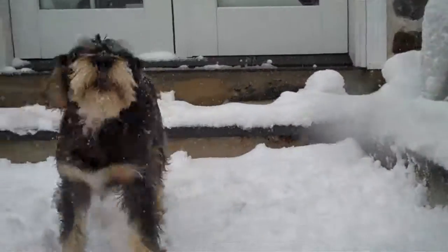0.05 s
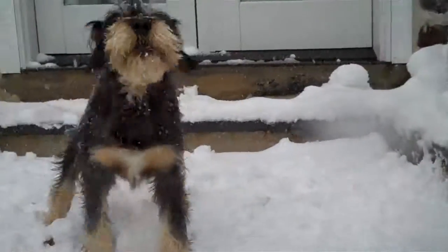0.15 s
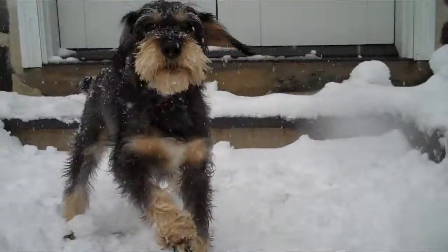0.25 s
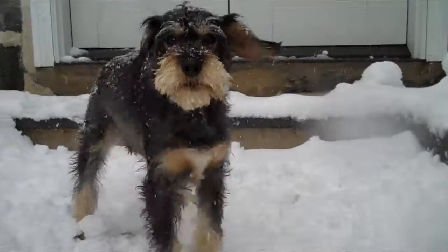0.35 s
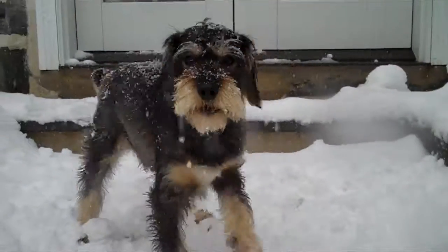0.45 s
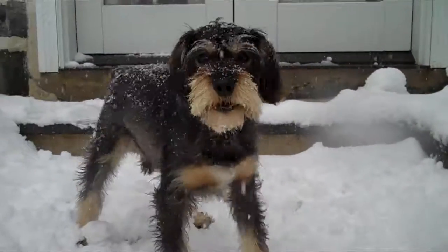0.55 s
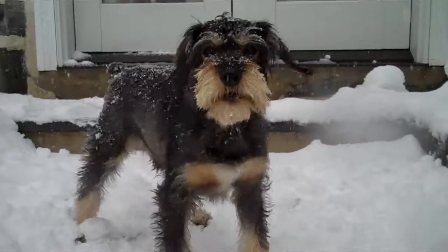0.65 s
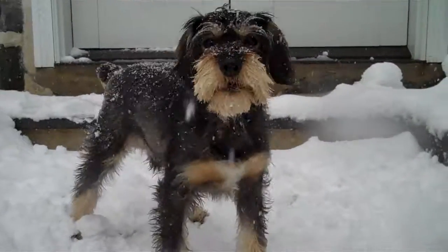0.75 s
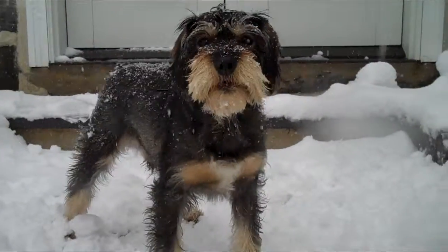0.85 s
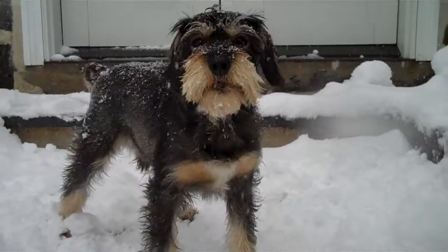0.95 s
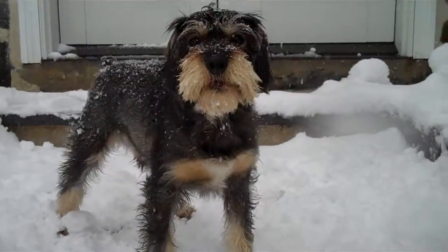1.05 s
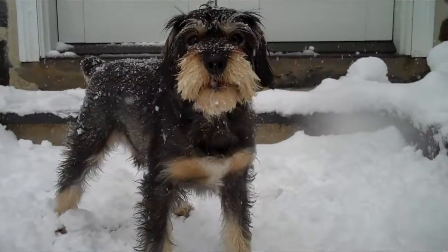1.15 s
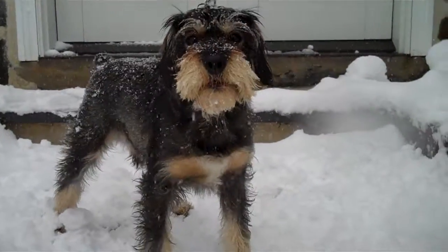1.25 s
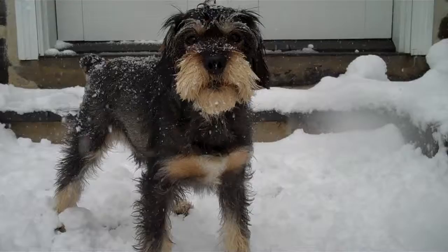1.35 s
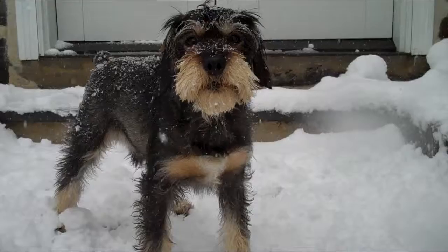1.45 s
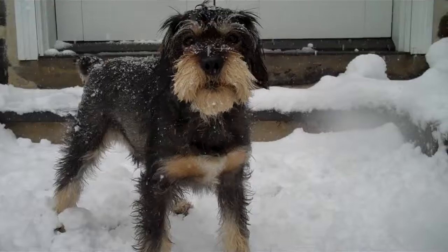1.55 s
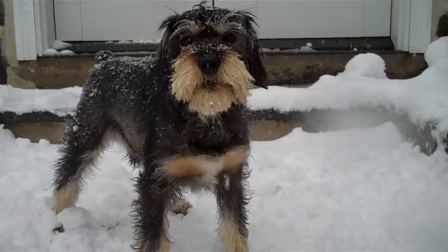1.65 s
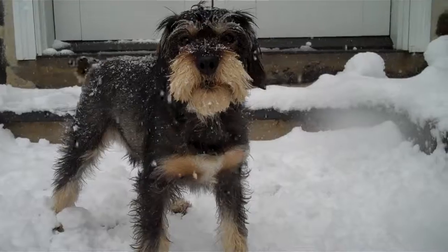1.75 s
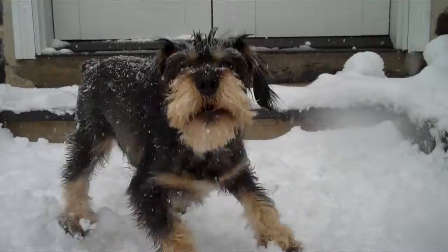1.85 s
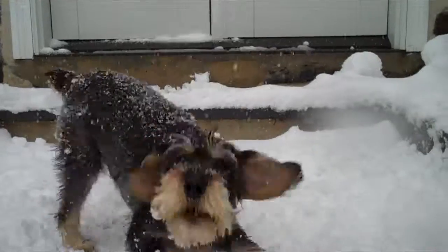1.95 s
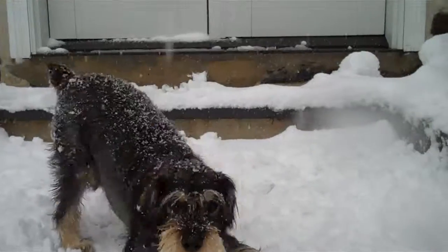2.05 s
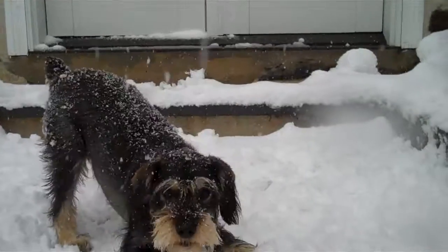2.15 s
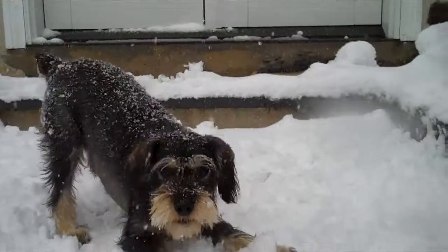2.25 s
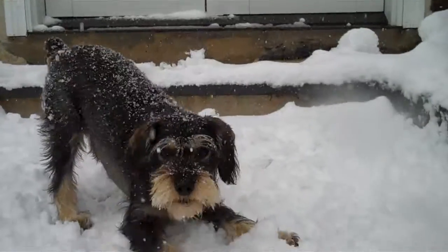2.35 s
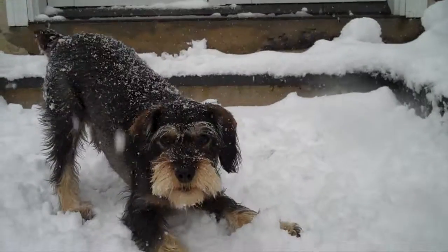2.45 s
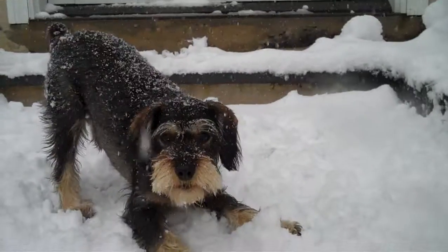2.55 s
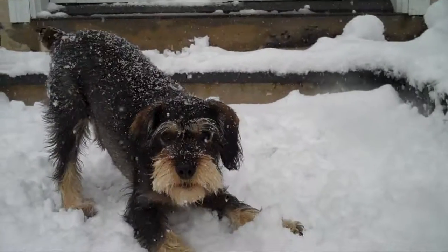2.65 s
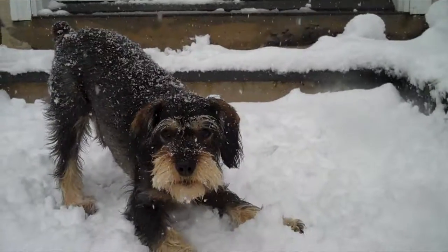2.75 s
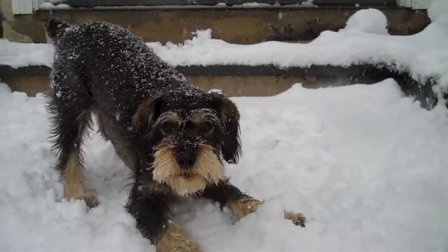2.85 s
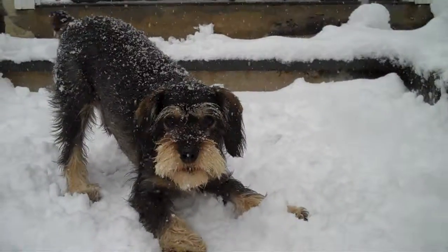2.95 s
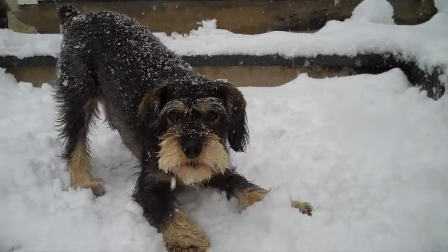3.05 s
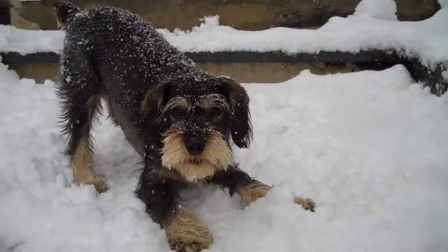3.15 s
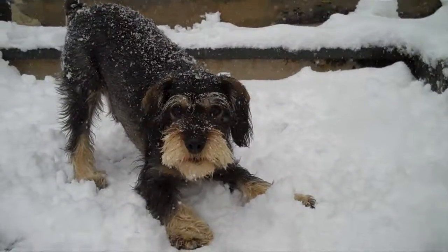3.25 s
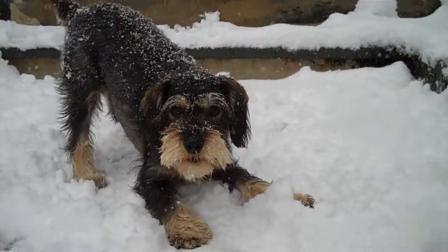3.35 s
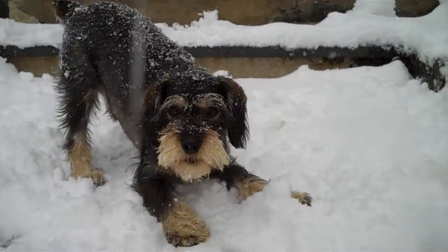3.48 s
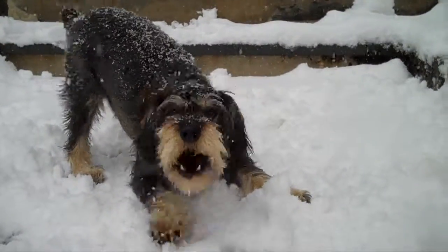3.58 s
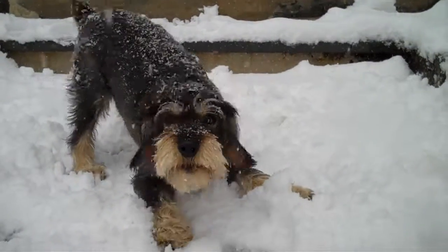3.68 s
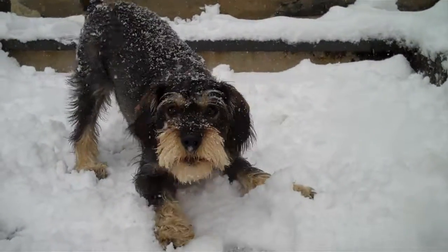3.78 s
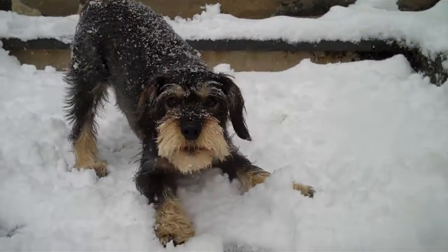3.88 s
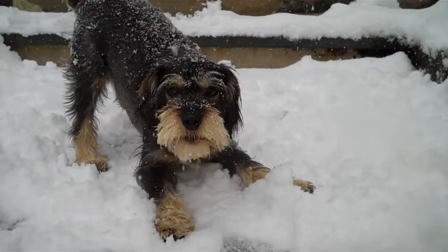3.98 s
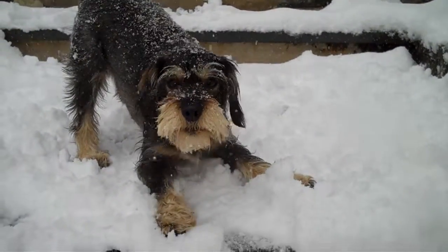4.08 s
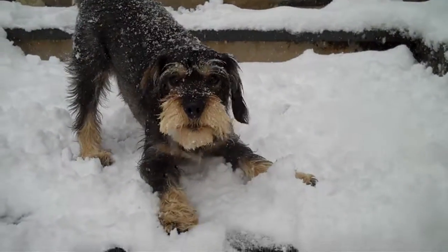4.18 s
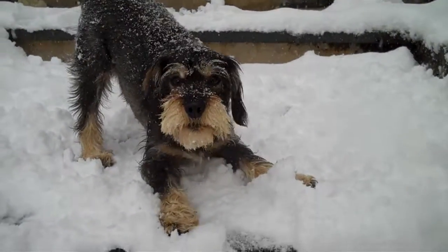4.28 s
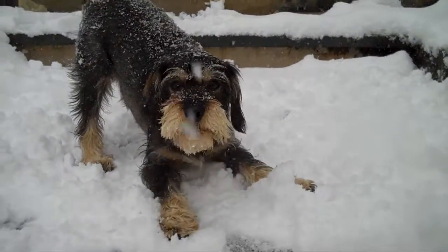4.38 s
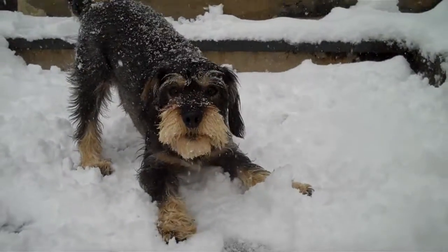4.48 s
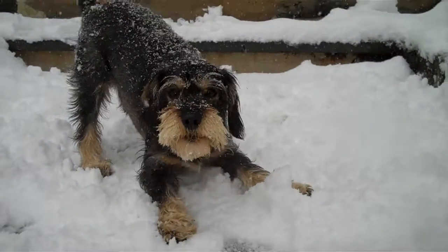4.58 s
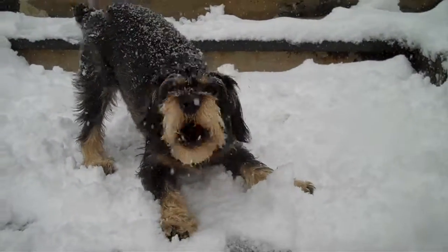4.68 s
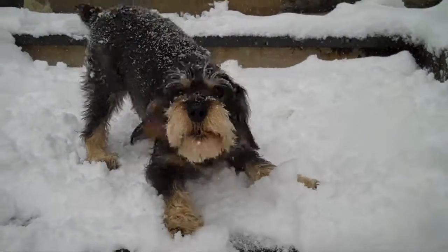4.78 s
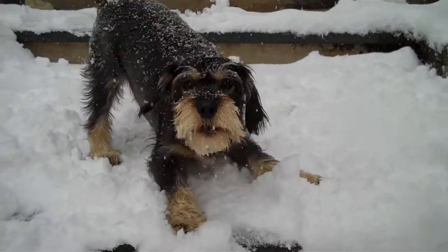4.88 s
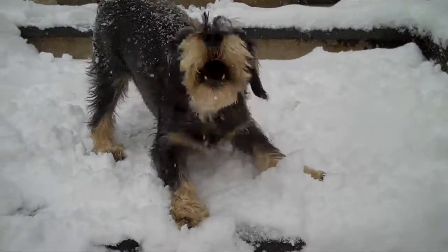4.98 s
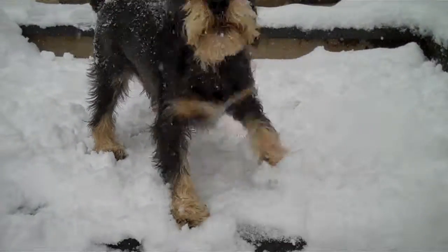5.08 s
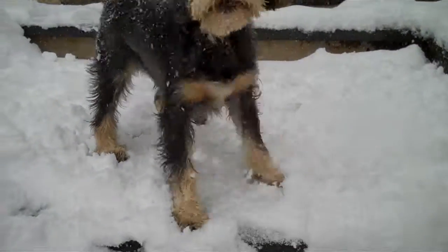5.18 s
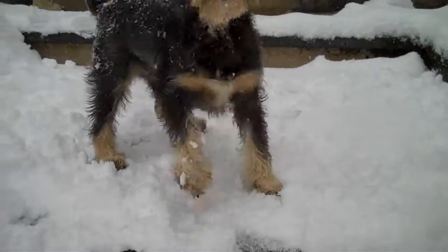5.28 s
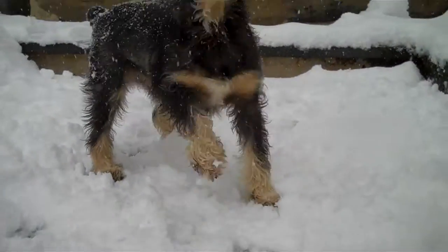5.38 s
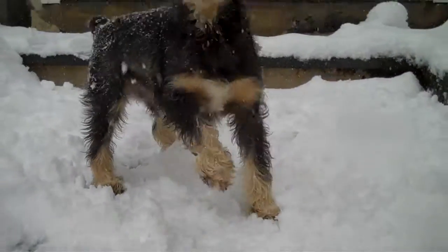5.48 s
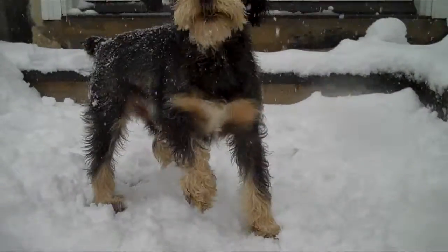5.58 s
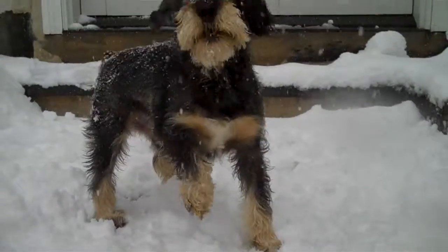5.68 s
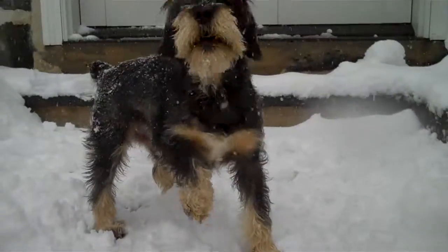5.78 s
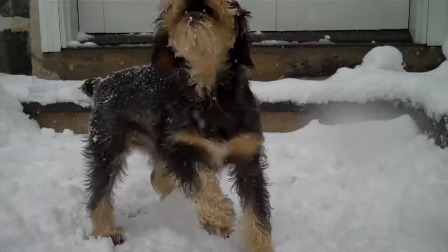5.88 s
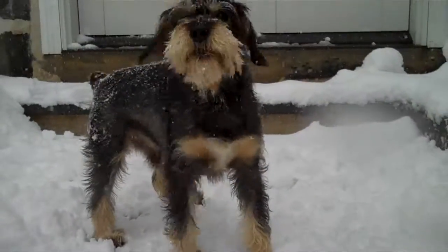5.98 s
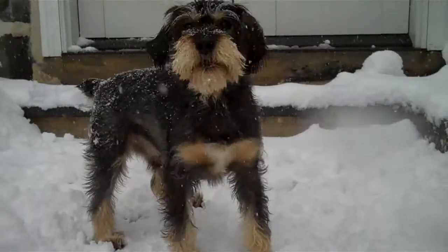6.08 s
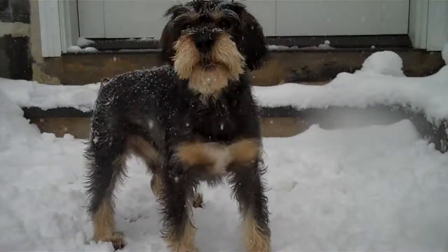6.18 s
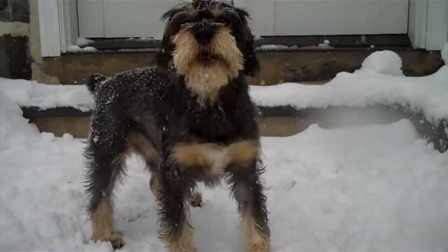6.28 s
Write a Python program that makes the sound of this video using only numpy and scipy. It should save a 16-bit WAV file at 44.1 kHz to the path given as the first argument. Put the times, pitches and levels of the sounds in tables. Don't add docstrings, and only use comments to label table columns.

```python
import sys
import numpy as np
from scipy import signal
from scipy.fft import rfft, irfft, next_fast_len
from scipy.io import wavfile
from scipy.ndimage import uniform_filter1d

SR = 44100
rng = np.random.default_rng(int(sys.argv[2]) if len(sys.argv) > 2 else 0)


def dump(signal):
    limited = np.clip(np.atleast_2d(signal).T, -1, 1)
    pcm = np.round(limited * 32767).astype(np.int16)
    wavfile.write(sys.argv[1], SR, pcm)


def rack_gain(trim_db):
    fader = np.asarray(trim_db, float)
    return 10 ** (fader / 20)


N = 279153

# loudest_s, attack_s, hold_s, effort_db
BARKS = [
    (0.141, .065, 0.042, -12.5),
    (1.932, .035, 0.0835, -3),
    (3.641, .025, 0.0787, -5.5),
    (4.747, .027, 0.08313, -5),
    (5.034, .04, 0.06583, -8.5),
    (5.432, .042, 0.08254, -10),
    (5.899, .035, 0.0746, -6),
]
# top_hz, climb_s, sag_start_s
BARK_PITCH = [(636.4, 0.077, .172), (694.2, .068, 2.013), (679.6, .062, 3.7), (695.7, 0.06, 4.815),
              (676.8, 0.058, 5.078), (683.2, 0.049, 5.482), (687.1, 0.064, 5.957)]
# start_s, end_s, second_tone_above_hz, first_depth (0-1), last_depth (0-1)
VOICE_BREAKS = [(.19, .25, 150, .1, .1), (1.93, 2.06, 250, .2, .15), (3.678, 3.74, 100, 1, .1),
                (4.728, 4.88, 130, .8, .2), (5.036, 5.112, 105, .7, 0), (5.435, 5.525, 160, .35, .5),
                (5.915, 6.02, 170, .7, .4)]
# frequency_hz, level_db
THROAT = [(150, -46), (350, -13.5), (520, 2), (780, -4), (1000, -4), (1550, -6.5), (2100, -11.5),
          (2800, -18), (3400, -26.5), (5000, -38.5), (6200, -24.5), (7500, -18), (9000, -33.5),
          (14000, -47)]
# frequency_hz, width_hz, lift_db
MOUTH = [(738.8, 160, 1.5), (1612.2, 180, 4.5), (2167.2, 200, 4), (2643.6, 68, 1), (3330, 660, 2),
         (4450, 540, 6.5), (6825, 150, 0.5), (7593, 130, 1.5)]
# start_s, length_s, first_level_db, last_level_db, mouth_resonance_hz
GROWLS = [
    (3.883, .16, -50, -50, 598),
    (5.141, .09, -38, -50, 522),
    (5.205, .2, -53.5, -32.5, 550.6),
    (5.566, .075, -41, -61, 625.3),
]
GROWL_CHEST_DB = [6.5, -20.5, -25.5, -6.5]
GROWL_NASAL_DB = [1.5, -11.5, -10.5, 2]
# frequency_hz, width_hz, level_db
SHUT_MOUTH = [(313, 100, -13), (1103.7, 400, -11), (2210, 172, -15), (3300, 350, -13.5), (3816, 330, -18),
              (6490, 850, -8), (7290, 450, -8.5), (8247, 210, -16.5)]
# loudest_s, level_db,
# fall_db_per_s
SHUFFLES = [(0.025, -61, 907), (0.138, -34, 72.5), (0.229, -28, 345), (0.286, -46, 77.5), (2.05, -43, 200),
            (6.03, -47, 180)]
# frequency_hz, density_db_per_hz
SNOW_SPECTRUM = [(88, -17.5), (150, -10), (292, -6), (488, 2), (757, -10.5), (988, -2.5), (1720, -11),
                 (2160, -3.5), (4800, -14.5), (7730, -3.5), (14200, -40.5)]
# start_s, peak_db, ring_hz, left_right_db
FLAKES = [(0.0243, -35, 4390, 7), (0.0634, -51.5, 7520, 45.5), (0.617, -42, 1340, -7),
          (0.8608, -36, 7260, 8), (1.1273, -47, 8170, -14.5), (1.2167, -37.5, 1224, 4),
          (1.714, -46.5, 7250, 5.5), (1.7372, -50.5, 6900, -2.5), (1.8412, -34, 7600, 13.5),
          (2.2565, -41.5, 2208, -9.5), (2.4887, -58, 7900, 20), (2.7873, -48, 1480, -4),
          (2.8724, -49.5, 1487, 0), (3.2056, -51, 1221, 0.5), (3.2466, -42, 2160, -10),
          (3.8042, -48.5, 1325, 6.5), (4.0715, -58, 1282, -5.5), (4.1647, -59, 1300, -1),
          (4.6983, -43, 1690, -2)]
# loudest_s, level_db
FAR_CALLS = [(.7, -42), (0.949, -50), (1.29, -41.5), (2.565, -52.5), (2.811, -62), (2.985, -45),
             (3.295, -61.5), (4.315, -52), (4.61, -63)]
# pitch_hz, rasp (0-1), second_overtone_db, third_overtone_db
FAR_VOICES = [(575, 0.611, -1, 6), (726.1, 0.185, 1.5, -12), (570.7, 0.401, 8.5, -2.5),
              (685, 0.656, 7.5, -23), (728.2, 0.2, -4, -9.5), (570.1, 0.207, 14, -7.5),
              (634.6, 0.436, 12, -1), (673.5, 0.73, 8, -27.5), (706, 0.17, -3.5, -9)]
# frequency_hz, density_db_per_hz
AIR_SPECTRUM = [(15, -42), (25, -17), (65, -7.5), (117, -10), (170, -3), (258, -9), (500, -11), (1000, -17),
                (1300, -22), (2050, -24.5), (4500, -30), (7700, -20), (9500, -27.5), (13900, -24)]
# frequency_hz, likeness
AIR_LIKENESS = [(60, 0.8), (230, 0.63), (910, 0.978), (3540, 0.74), (13800, -1.2)]
# frequency_hz, likeness
DOG_LIKENESS = [(60, 0.32), (230, 1), (910, 0.92), (3540, 0.51), (13800, 0.7287)]
# frequency_hz, left_right_db
DOG_PAN = [(60, -1.5), (180, 1), (530, -1.5), (1560, 3), (4640, 4), (13800, 9)]
# frequency_hz, t60_s
WALL_DECAY = [(300, 0.088), (700, .17), (2000, 0.16), (4500, 0.24), (8000, 0.18)]
# frequency_hz, t60_s
YARD_DECAY = [(300, .3), (560, .45), (690, .9), (850, .6), (1300, .7), (1900, .6), (2600, .3), (8000, .15)]
# start_s, end_s, excess_db
OVERLOADS = [
    (1.918, 1.966, 3.5),
    (3.639, 3.68, 4),
    (4.742, 4.78, 1),
    (5.893, 5.905, .5),
]

ATTACK_DB, ATTACK_BEND, HOLD_SAG_DB_PER_S = 31, 1.7, 54.5
RELEASE_DB, RELEASE_BEND, RELEASE_S = 25, 1.5, .046
CLIMB_SHARE, CLIMB_BEND = .55, 1.35
SAG_SHARE, SAG_S, SAG_BEND = .35, .075, 1.4
OPEN_DB, OPEN_PER_DB, CLOSED_DB, BREATH_DB = 2.5, 0.8616, -13, -15.5
WOOF_CLIMB, WOOF_UNEVEN, WOOF_MUFFLE_DB, WOOF_BREATH_DB = .36, 0.857, -10.5, -1
GROWL_PULSES_PER_S, GROWL_EDGE_S = 122, .015
SNORT_S, SNORT_DB, SNORT_RISE_DB_PER_S, SNORT_FALL_DB_PER_S = .222, -27.5, 902.5, 704
SHUFFLE_RISE_DB_PER_S, SHUFFLE_STOPS_S = 229, .475
FAR_RISE_DB_PER_S, FAR_HOLD_S, FAR_FALL_DB_PER_S = 378.5, 0.034, 184
AIR_DB = -59.5


def bark(row, pitch, voice_break, woof):
    loud_s, attack, hold, top_db = row
    top_hz, climb, sag_s = pitch
    start, end, gap_hz, first, last = voice_break
    t = np.arange(loud_s - attack, loud_s + hold + 1.15 * RELEASE_S, 1 / SR)

    below_db = ATTACK_DB * past(-t, -loud_s, attack, ATTACK_BEND)
    below_db += HOLD_SAG_DB_PER_S * np.clip(t - loud_s, 0, hold)
    below_db += RELEASE_DB * past(t, loud_s + hold, RELEASE_S, RELEASE_BEND)
    lift_db = np.maximum(OPEN_DB - OPEN_PER_DB * below_db, CLOSED_DB)
    lift_db += woof * (WOOF_MUFFLE_DB - .25 * below_db)
    breath_db = BREATH_DB + woof * WOOF_BREATH_DB
    uneven = woof * WOOF_UNEVEN
    broken = np.clip(np.minimum(t - start, end - t) / 0.0052 + .5, 0, 1)

    depth = WOOF_CLIMB if woof else 1
    climbing = depth * CLIMB_SHARE * past(-t, -t[0] - climb, climb, CLIMB_BEND)
    sagging = depth ** .5 * SAG_SHARE * past(t, sag_s, SAG_S, SAG_BEND)
    hz = top_hz * (1 - climbing - sagging)
    turns = np.cumsum(hz * (1 + 0.012 * wander(len(t), 0.0021))) / SR
    beat = np.cumsum(gap_hz * (1 + .16 * wander(len(t), .007))) / SR
    shaky = turns + (.004 + .013 * broken) * wander(len(t), .001)

    overtones = sum(np.cos(2 * np.pi * k * shaky + .9 * k ** 2) for k in range(2, 20))
    beating = np.cos(2 * np.pi * beat + .8 * np.sin(2 * np.pi * beat))
    overtones *= 1 - .45 * broken + .8 * max(first, last) * broken * beating
    halves = uneven * sum(np.cos(np.pi * k * shaky + 0.36 * k ** 2) for k in range(1, 24, 2))

    puffs = (.5 + np.exp(-(turns % 1) / 1.1)) * rng.standard_normal(len(t))
    puffs *= rack_gain(1.7 * wander(len(t), 0.0008))
    breath = colour(puffs, [(500, -25.5), (900, 14.5), (5000, 6.0), (7000, 16), (11000, -3.5)])

    fading = broken * (last + (first - last) * past(-t, -end, end - start, 2.4))
    first_gain = (1 - .4 * fading) * (hz / 650) ** 2.1 * rack_gain(1.5 * broken * wander(len(t), .004))
    tones = first_gain * np.cos(2 * np.pi * turns)
    tones += 1.8 * fading * np.cos(2 * np.pi * (turns + beat))
    tones += 0.61 * uneven * np.cos(np.pi * turns)

    rasp = .42 * broken * breath
    drive = tones + rack_gain(lift_db) * (overtones + halves + rasp)
    drive += rack_gain(np.minimum(breath_db, -13)) * breath
    rung = sum(rack_gain(db) * resonate(drive, f, width) for f, width, db in MOUTH)
    voice = colour(drive + rung, THROAT)
    steady = voice / np.sqrt(uniform_filter1d(voice ** 2, size=700) + 1e-9)
    return t[0], rack_gain(top_db - below_db) * steady * signal.windows.tukey(len(t), .08)


def growl(row, chest_db, nasal_db):
    start, length, first_db, last_db, mouth_hz = row
    t = start + np.arange(0, length, 1 / SR)
    level_db = np.linspace(first_db, last_db, len(t))
    turns = np.cumsum(GROWL_PULSES_PER_S * (1 + 0.27 * wander(len(t), 0.0066))) / SR
    flaps = (.3 + np.exp(-(turns % 1) / .2)) * rack_gain(2.2 * wander(len(t), .012))
    drive = flaps * (0.71 + rng.standard_normal(len(t)))
    drive = colour(drive, [(50, -40), (90, 0)])
    sound = rack_gain(chest_db) * evened(double_resonance(drive, 125, 67))
    sound += evened(double_resonance(drive, mouth_hz, 89))
    for f, width, db in SHUT_MOUTH:
        sound += rack_gain(db + nasal_db * (f > 2000)) * evened(double_resonance(drive, f, width))
    return t[0], rack_gain(level_db) * evened(sound) * signal.windows.tukey(len(t), 2 * GROWL_EDGE_S / length)


def snort():
    t = SNORT_S + np.arange(-2000, 3000) / SR
    gain = swell(t, SNORT_S, SNORT_DB, SNORT_RISE_DB_PER_S, SNORT_FALL_DB_PER_S)
    return t[0], gain * evened(double_resonance(rng.standard_normal(len(t)), 3850, 720))


def shuffle():
    t = np.arange(N) / SR
    level = sum(swell(t, s, db, SHUFFLE_RISE_DB_PER_S, fall_db) for s, db, fall_db in SHUFFLES)
    size = rack_gain(4.5 * np.minimum(rng.exponential(1, (2, N)), 3))
    size *= rng.random((2, N)) < 4000 / SR
    crunch = size * rng.standard_normal(size.shape) + 1.1 * rng.standard_normal(size.shape)
    both = evened(colour(crunch + 1.2 * crunch[::-1], SNOW_SPECTRUM))
    stopped = np.clip((t - SHUFFLE_STOPS_S) / 0.0082, 0, 1) * (t < 1)
    return level * rack_gain(-4.0 - 5.1 * stopped) * both * rack_gain([[1.5], [-1.5]])


def flakes():
    out = np.zeros((2, N))
    t = np.arange(400) / SR
    for s, db, hz, pan in FLAKES:
        ring = np.sin(2 * np.pi * hz * t) * rack_gain(-60 * t / 0.012)
        ring += 3.4 * np.sin(2 * np.pi * 7400 * t) * rack_gain(-60 * t / 0.00184)
        tick = .5 * np.exp(-t / .0001)
        add(out, s, rack_gain(db - 7.5) * (ring + tick) * rack_gain([[pan / 2], [-pan / 2]]))
    faint = rack_gain(4 * np.minimum(rng.exponential(1, (2, N)), 2.5))
    faint *= rng.random((2, N)) < 30 / SR
    return out + rack_gain(-58) * resonate(faint, 7300, 2500)


def far_call(row, voice):
    loud_s, level_db = row
    hz, rasp, second_db, third_db = voice
    t = loud_s + np.arange(-6000, 10000) / SR
    noise = rng.standard_normal(len(t))
    width = 25 + 330 * rasp ** 2
    levels_db = [0, second_db, third_db] + [-21 - k for k in range(9)]
    call = rack_gain(10) * rasp * evened(double_resonance(noise, 1550, 320))
    for k, db in enumerate(levels_db, 1):
        call += rack_gain(db) * evened(double_resonance(noise, k * hz, width))
    held = t - np.clip(t - loud_s, 0, FAR_HOLD_S)
    gain = swell(held, loud_s, level_db, FAR_RISE_DB_PER_S, FAR_FALL_DB_PER_S)
    return t[0], gain * evened(call) * signal.windows.tukey(len(t), .15)


def air():
    frames, hz = N // 256 + 5, np.fft.rfftfreq(1024, 1 / SR)
    a, b, c, d, patches = rng.standard_normal((frames, 513, 5)).T
    patches = uniform_filter1d(patches, size=12, axis=0)
    patches = evened(uniform_filter1d(patches, size=14, axis=1))
    same = np.clip(read(AIR_LIKENESS, hz), -1, 1)[:, None]
    left = a + 1j * b
    z = np.array([left, same * left + np.sqrt(1 - same ** 2) * (c + 1j * d)])
    z *= rack_gain(read(AIR_SPECTRUM, hz)[:, None] + 0.5 * patches)
    noise = signal.istft(z, nperseg=1024, noverlap=768)[1][:, :N]
    return rack_gain(AIR_DB + np.array([[1.8], [-.4]])) * evened(noise)


def echoes(t60_of, count, delay):
    taps = rng.choice([-1., 1.], (2, count)) * (rng.random((2, count)) < .08)
    taps *= np.arange(count) > delay * SR
    hz, t, z = signal.stft(taps, SR, nperseg=256)
    tail = signal.istft(z * rack_gain(-60 * t / t60_of(hz)[:, None]), SR, nperseg=256)[1]
    return tail / np.linalg.norm(tail[0])


def ports(x):
    hz = np.fft.rfftfreq(N, 1 / SR)
    same = np.clip(read(DOG_LIKENESS, hz), 0, 1)
    scatter = rfft(echoes(lambda f: 0.042 + 0 * f, count=2200, delay=.0003), N)
    pan = rack_gain(read(DOG_PAN, hz) * np.array([[.5], [-.5]]))
    return irfft(rfft(x) * pan * (np.sqrt(same) + 0.88 * np.sqrt(1 - same) * scatter), N)


def turned_down(dog):
    t = np.arange(N) / SR
    loud = uniform_filter1d(dog ** 2, size=900) > rack_gain(-10.5) ** 2
    since = t - np.maximum.accumulate(np.where(loud, t, -np.inf))
    cut_db = np.clip(13. - 18.0 * (since - .45), 0, 13.)
    return rack_gain(-uniform_filter1d(cut_db, size=400))


def evened(x):
    return x / np.sqrt(np.mean(x ** 2) + 1e-20)


def read(points, hz):
    f, value = np.transpose(points)
    return np.interp(np.log(hz + 1), np.log(f + 1), value)


def add(mix, s, sound):
    part = mix[..., round(s * SR):][..., :sound.shape[-1]]
    part += sound[..., :part.shape[-1]]


def colour(x, points):
    padded = next_fast_len(x.shape[-1] + 2048)
    gain = rack_gain(read(points, np.fft.rfftfreq(padded, 1 / SR)))
    return irfft(rfft(x, padded) * gain, padded)[..., :x.shape[-1]]


def resonate(x, hz, width):
    return signal.lfilter(*signal.iirpeak(hz, hz / width, SR), x)


def double_resonance(x, hz, width):
    turn = np.exp(2j * np.pi * hz * np.arange(1, len(x) + 1) / SR)
    r = np.exp(-np.pi * width / SR)
    return (turn * signal.lfilter([1], np.poly([r, r]), x / turn)).real


def wander(count, seconds):
    size = int(seconds * SR)
    return evened(uniform_filter1d(uniform_filter1d(rng.standard_normal(count), size), size))


def swell(t, s, db, rise_db, fall_db):
    return rack_gain(db - np.where(t < s, rise_db * (s - t), fall_db * (t - s)))


def past(t, s, span, bend):
    return np.maximum((t - s) / span, 0) ** bend


def scene():
    dog, far = np.zeros(N), np.zeros(N)
    for k, one in enumerate(zip(BARKS, BARK_PITCH, VOICE_BREAKS)):
        add(dog, *bark(*one, woof=k == 0))
    yard_taps = echoes(lambda f: read(YARD_DECAY, f), count=SR, delay=0.034)
    yard = signal.fftconvolve(dog[None], yard_taps, axes=1)[:, :N]
    wall_taps = echoes(lambda f: read(WALL_DECAY, f), count=SR // 3, delay=0.002)
    wall = signal.fftconvolve(dog[None], wall_taps, axes=1)[:, :N]
    for one in zip(GROWLS, GROWL_CHEST_DB, GROWL_NASAL_DB):
        add(dog, *growl(*one))
    add(dog, *snort())
    for row, voice in zip(FAR_CALLS, FAR_VOICES):
        add(far, *far_call(row, voice))

    mix = ports(dog) + rack_gain(-48.5) * yard
    mix += colour(wall, [(700, -35.0), (1500, -32), (3000, -24.5), (5000, -16.0), (9000, -20)])
    mix += shuffle() + flakes() + ports(far)
    mix += turned_down(dog) * air()
    return mix


def band_limit(x):
    return signal.sosfilt(signal.butter(12, 14360, fs=SR, output="sos"), x)


def record(dry):
    t = np.arange(N) / SR
    over_db = sum(db * np.clip(np.minimum(t - start, end - t) / 0.00052, 0, 1) for start, end, db in OVERLOADS)
    hot = dry * rack_gain(over_db)
    up = np.clip((hot[0] - 1) / .06, 0, 1)
    down = np.clip((-hot[0] - 1.35) / .06, 0, 1)
    wrapped = hot[0] - 2 * (over_db > 0) * (up - down)
    clipped = np.clip([wrapped, hot[1]], -1, 1)
    coupled = signal.lfilter(*signal.butter(1, 4.0, "high", fs=SR), clipped)
    edged = colour(coupled, [(14250, 0), (14400, -15), (22050, -18)])
    return band_limit(np.clip(edged, -1, 1))


dry = scene()
out = record(dry)
dump(out)
```